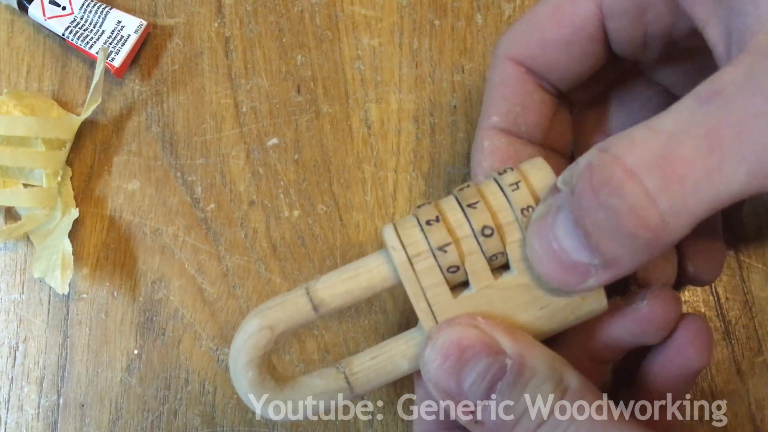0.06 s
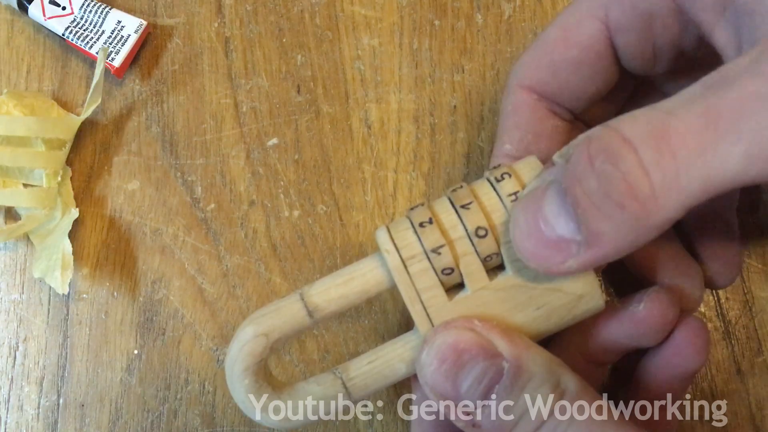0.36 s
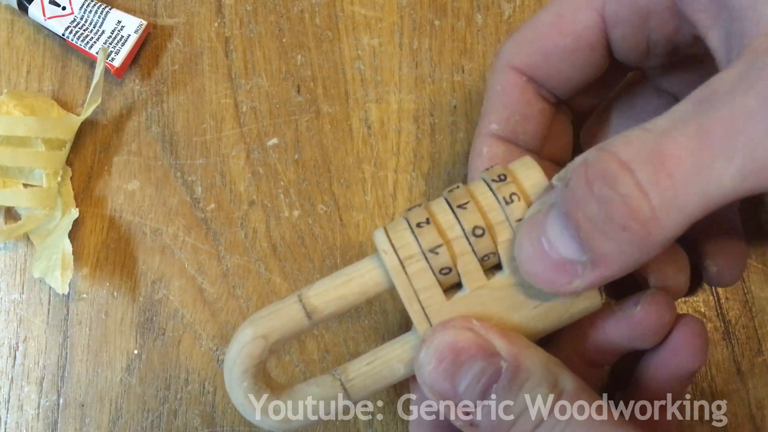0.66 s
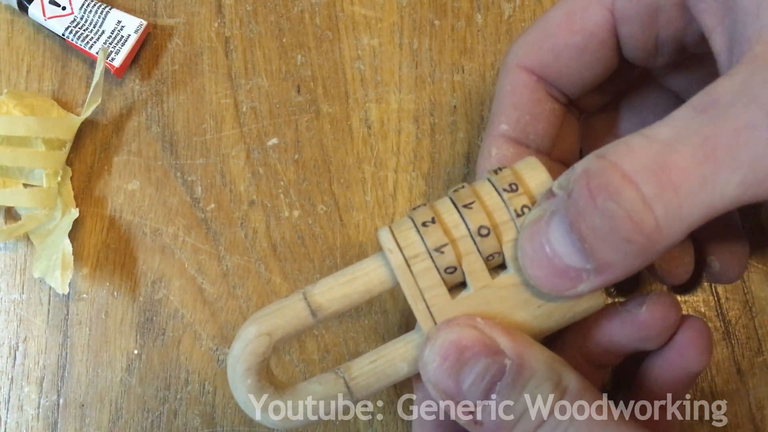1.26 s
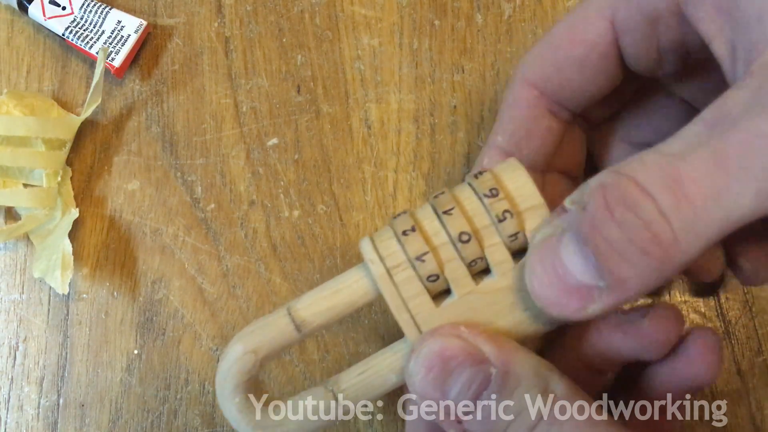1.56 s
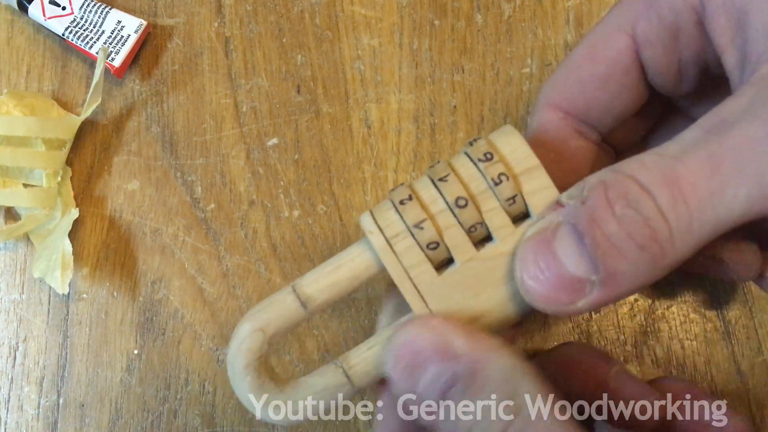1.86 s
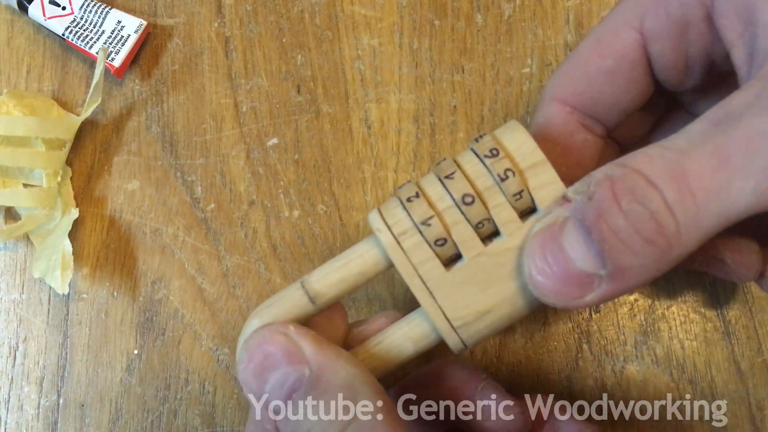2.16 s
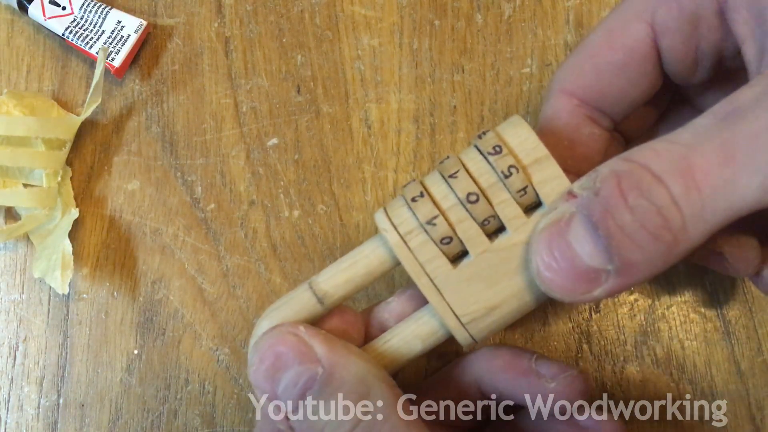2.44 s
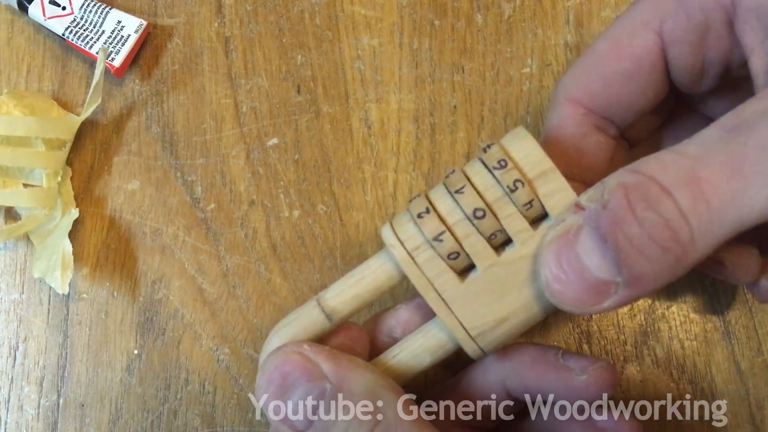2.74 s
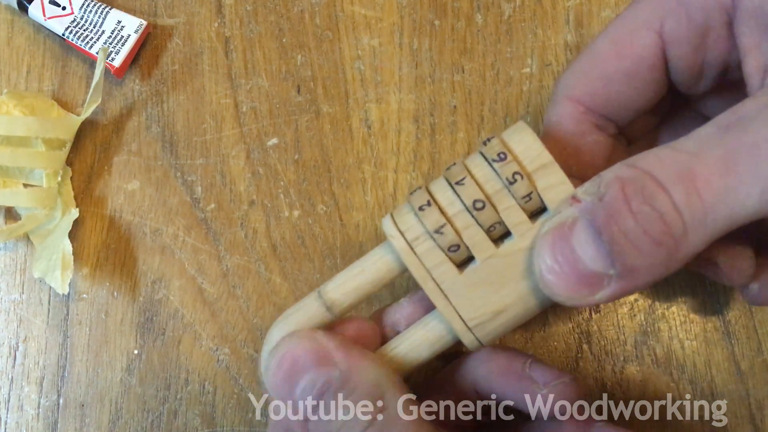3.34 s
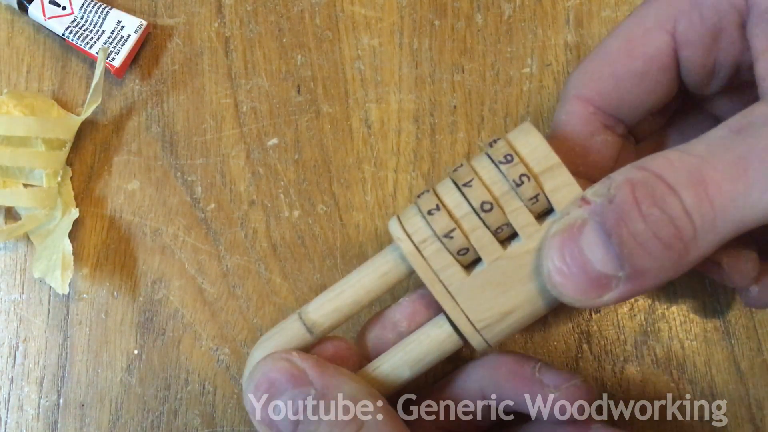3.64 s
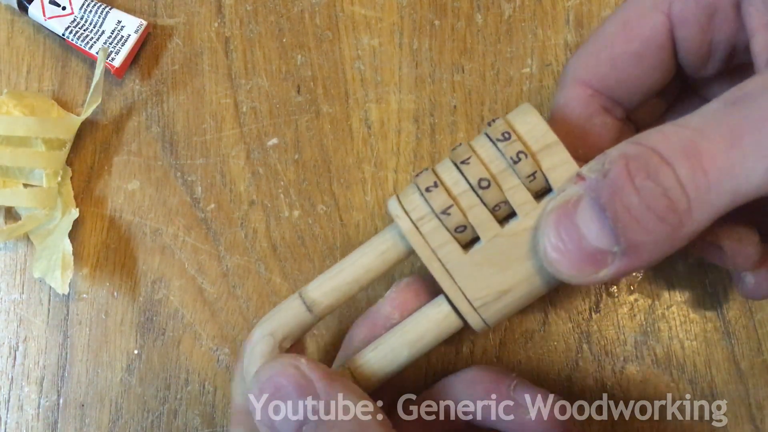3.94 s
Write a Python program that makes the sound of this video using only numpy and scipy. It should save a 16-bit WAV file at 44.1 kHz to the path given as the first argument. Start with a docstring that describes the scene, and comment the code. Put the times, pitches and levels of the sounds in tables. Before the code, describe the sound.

A wooden combination lock is worked close up over a low hum in a small, quiet room. For the first second its dial turns with soft rubs and faint ticks. Fingers slide over the wood from about 1.5 to 2.3 seconds. A light click comes near 3.2; at 3.4 the shackle frees with a sharp clack, brief scrape and knock. A soft rub follows near 3.9.

```python
"""Soft rubbing and ticking over a low room hum: a thumb turns a dial of a wooden combination lock.
Fingers slide to a new grip and try the shackle. A tug frees it with a sharp clack;
it scrapes outward and knocks against its stop. Rubs and scrapes are dense tiny slips;
each wood contact cracks and rings the lock's modes. Heard close up in a small, quiet room."""
import sys
import numpy as np
from scipy import signal
from scipy.fft import rfft, irfft
from scipy.io import wavfile
from scipy.ndimage import uniform_filter1d

SR = 44100
rng = np.random.default_rng(int(sys.argv[2]) if len(sys.argv) > 2 else 0)


def master_out(mix):
    """Clip the mix to full scale and print it as 16-bit PCM to the path in sys.argv[1]."""
    frames = np.transpose(np.atleast_2d(mix))
    ceiling = np.clip(frames, -1, 1)
    pcm = np.round(ceiling * 32767).astype(np.int16)
    wavfile.write(sys.argv[1], SR, pcm)


N = 176400

# room rumble and hiss: freq_hz, relative_db
AIR_SPECTRUM = [(20, -89), (27, -72), (34, -58), (45, -70.5), (66, -62), (82, -69), (120, -69.5),
                (160, -74), (210, -79), (330, -81.5), (480, -89), (750, -91.5), (1050, -92.5),
                (1500, -96.5), (2800, -95.5), (4300, -98.5), (6100, -97), (7200, -98), (9500, -97),
                (13000, -97), (16000, -103)]
# appliance hum: pitch_hz, level_db, waver_db
HUM_TONES = [(103, -66.5, 1.5), (299, -79, 0), (322, -77.5, 1)]
# deep drone: time_s, level_db
DRONE_ENVELOPE = [(0, -48), (.35, -50), (.65, -48), (1.1, -50), (1.4, -47.5), (1.75, -51), (2.05, -47),
                  (2.4, -50.5), (2.8, -47.3), (3.15, -50.5), (3.5, -48.5), (4, -49)]
# thin whine: time_s, level_db
WHINE_ENVELOPE = [(0, -82), (1.5, -83), (2.3, -85.5), (3, -85.5), (4, -86.5)]
# reverb: low_hz, high_hz (capped below Nyquist), t60_s, gain_db
REVERB_BANDS = [(150, 630, 0.62, 0), (710, 1700, 0.5, -2.5), (1480, 3300, 0.39, -.5),
                (3200, 5600, 0.38, -3.5), (7900, 29000, 0.26, -5)]
# skin sliding on wood: start_s, length_s, level_db, tilt_db_per_octave
FINGER_STROKES = [(1.562, .04, -72, 2), (1.534, 0.39, -70, 0), (1.801, 0.028, -66, -1),
                  (1.885, 0.079, -57, 3.5), (1.99, 0.049, -63.5, 10), (1.887, 0.33, -63.5, 0),
                  (2.266, 0.12, -72, -1.5), (3.187, 0.046, -68, -0.5), (3.915, 0.12, -64.5, 0)]
# skin friction: freq_hz, relative_db
SKIN_SPECTRUM = [(300, -8), (700, -6), (1150, -2.5), (2000, -6.5), (2900, -1.5), (3700, 1.5), (4900, -1),
                 (5600, 0.5), (7200, -3.5), (8900, 1.5), (9700, 0), (11200, 1), (12300, -3), (13000, 0.5),
                 (16000, -11)]
# dial turns: start_s, length_s, level_db
DIAL_STROKES = [(0.107, 0.14, -66), (0.283, 0.13, -72), (0.441, 0.19, -67), (0.768, 0.15, -77.5)]
# dial friction: freq_hz, relative_db
DIAL_SPECTRUM = [(400, -27), (1500, -4), (2300, -6), (3100, 1), (4900, -6.5), (6400, 3), (8000, -3),
                 (9700, 1.5), (13000, -3), (16000, -7)]
# binding surfaces: start_s, length_s, level_db, pitch_hz
BIND_STROKES = [(0.293, .10, -70.5, 7130), (0.723, 0.045, -70.5, 6400), (1.901, 0.072, -58.5, 8970),
                (3.143, 0.015, -65.5, 3820), (3.396, .03, -70, 2520), (3.447, 0.013, -48.5, 2850),
                (3.937, 0.074, -60, 8000)]
# shackle scrapes: start_s, length_s, level_db
SHACKLE_STROKES = [(3.151, 0.0098, -64), (3.407, 0.031, -68.5), (3.4337, 0.0326, -45.5)]
# shackle friction: freq_hz, relative_db
SHACKLE_SPECTRUM = [(150, 5), (400, -21), (1100, -5.5), (2000, -5), (2850, -1), (3600, -5), (4900, -10),
                    (6400, -2.5), (7800, -4), (10000, -1), (16000, -12.5)]
# lock resonances: pitch_hz, relative_db, t60_s
BODY_MODES = [(597, -21.5, 0.0053), (964, -16, 0.013), (1220, -13, 0.0071), (1820, -16, 0.009),
              (2440, -18.5, 0.0038), (2810, -13, 0.0058), (3700, -15, 0.0068), (4230, -20.5, 0.006),
              (6150, -5.5, 0.0093), (6930, -11.5, 0.01), (8200, -11, 0.0045), (9210, -10.5, 0.0063),
              (10500, -5.5, 0.0034), (13600, -12, 0.0028)]
# wood on wood: start_s, relative_db, low_hz, high_hz
CONTACTS = [(.392, -46.5, 2500, 11800), (.474, -45, 11000, 18000), (.671, -48.5, 5500, 18000),
            (0.72, -53, 5500, 18000), (.807, -56, 1800, 9000), (.857, -51.5, 2000, 12000),
            (1.172, -59, 6000, 18000), (1.573, -42, 2200, 4500), (1.820, -44.5, 2500, 7960),
            (2.013, -33, 1000, 2400), (3.128, -43.5, 3500, 16900), (3.1598, -24.5, 400, 3860),
            (3.4353, -25, 400, 2200), (3.4381, -18.5, 590, 12500), (3.4399, -6, 7350, 8300),
            (3.4637, -16, 404, 2740), (3.4652, -29.5, 6500, 17000), (3.4655, -24.5, 690, 3260),
            (3.885, -44, 3000, 7940), (3.917, -58, 2500, 10100)]
# microphone dips: centre_hz, width_hz, depth_fraction
MIC_NOTCHES = [(4940, 460, .4), (7900, 590, 0.27), (10410, 500, .45)]

DIAL_SLIPS_PER_S, DIAL_SPREAD_DB = 5000, -1


def amp(db):
    """Decibels to gain."""
    return 10 ** (np.asarray(db) / 20)


def unit(x):
    """Scale to rms 1."""
    return x / np.sqrt(np.mean(x ** 2))


def colour(x, spectrum, tilt_db_per_octave=0):
    """Shape and tilt the spectrum, 20 dB per octave roll-off past its ends; rms 1."""
    octave = np.log2(np.maximum(np.fft.rfftfreq(N, 1 / SR), 1))
    hz, db = np.array(spectrum).T
    inside = np.clip(octave, np.log2(hz[0]), np.log2(hz[-1]))
    shape_db = np.interp(inside, np.log2(hz), db) + tilt_db_per_octave * inside
    rolloff_db = 20 * np.abs(octave - inside)
    return unit(irfft(rfft(x) * amp(shape_db - rolloff_db), N))


def band(x, hz, kind):
    """Second-order Butterworth filter."""
    sos = signal.butter(2, np.minimum(hz, SR / 2 - 20), kind, fs=SR, output="sos")
    return signal.sosfilt(sos, x)


def wander(rate_hz):
    """Smooth random curve, rms 1."""
    hold = int(SR / rate_hz)
    steps = np.repeat(rng.standard_normal(N // hold + 1), hold)
    return unit(uniform_filter1d(uniform_filter1d(steps, hold), hold)[:N])


def add(out, start_s, x):
    """Mix x in at start_s."""
    i = int(start_s * SR)
    out[i:i + len(x)] += x[:N - i]


def decay(t, t60_s):
    """Exponential fall, 60 dB in t60_s."""
    return np.exp(-np.log(1000) * t / t60_s)


def stroke(start_s, length_s, attack=0.35, release=0.42):
    """Trapezoid envelope of one movement; ramps are fractions of its length."""
    progress = (np.arange(N) / SR - start_s) / length_s
    return np.clip(np.minimum(progress / attack, (1 - progress) / release), 0, 1)


def friction(slips_per_s, spread_db, flutter_hz=110, flutter_db=1.5):
    """Dense tiny slips of uneven size under fluttering hand pressure."""
    slips = rng.random(N) < slips_per_s / SR
    size_db = spread_db * np.minimum(rng.exponential(size=N), 4)
    pressure_db = flutter_db * wander(flutter_hz)
    return slips * rng.standard_normal(N) * amp(size_db + pressure_db)


def tone(pitch_hz, rms_db, drift_hz=0.25):
    """Sine with slight pitch drift."""
    cycles = np.cumsum(pitch_hz + drift_hz * wander(rate_hz=4)) / SR
    return np.sqrt(2) * amp(rms_db) * np.sin(2 * np.pi * cycles)


def background(air_db=-64, drone_hz=51.9, whine_hz=962.6):
    """Rumble and hiss, wavering appliance hum, deep drone, thin whine."""
    t = np.arange(N) / SR
    air = amp(air_db) * colour(rng.standard_normal(N), AIR_SPECTRUM)
    hum = sum(tone(hz, db + waver_db * wander(rate_hz=6.05)) for hz, db, waver_db in HUM_TONES)
    drone = tone(drone_hz, np.interp(t, *np.array(DRONE_ENVELOPE).T))
    whine = tone(whine_hz, np.interp(t, *np.array(WHINE_ENVELOPE).T))
    return air + hum + drone + whine


def room(x, gain_db=-10.5, buildup_s=0.02):
    """Small-room reverb; treble dies first."""
    t = np.arange(SR // 2) / SR
    tail = sum(amp(db) * band(rng.standard_normal(len(t)), [low_hz, high_hz], "band") * decay(t, t60_s)
               for low_hz, high_hz, t60_s, db in REVERB_BANDS)
    mid_t60_s = REVERB_BANDS[1][2]
    decay_energy = SR * mid_t60_s / np.log(1000) / 2
    tail *= np.minimum(t / buildup_s, 1) / np.sqrt(decay_energy)
    return amp(gain_db) * signal.fftconvolve(x, tail)[:N]


def fingers():
    """Skin hisses over wood; each stroke has its own brightness."""
    grain = friction(slips_per_s=12000, spread_db=0.5)
    return sum(amp(db) * colour(grain, SKIN_SPECTRUM, tilt) * stroke(start_s, length_s)
               for start_s, length_s, db, tilt in FINGER_STROKES)


def dial():
    """The dial rubs on its neighbours."""
    grain = colour(friction(DIAL_SLIPS_PER_S, DIAL_SPREAD_DB), DIAL_SPECTRUM)
    return grain * sum(amp(db) * stroke(start_s, length_s) for start_s, length_s, db in DIAL_STROKES)


def binds(width_hz=530):
    """Where a surface binds, friction gathers in one narrow resonance."""
    out = np.zeros(N)
    grain = friction(DIAL_SLIPS_PER_S, DIAL_SPREAD_DB)
    for start_s, length_s, db, hz in BIND_STROKES:
        resonance = signal.lfilter(*signal.iirpeak(hz, hz / width_hz, fs=SR), grain)
        out += amp(db) * unit(resonance) * stroke(start_s, length_s)
    return out


def shackle():
    """The shackle scrapes in its holes, starting and stopping abruptly."""
    grain = colour(friction(slips_per_s=25000, spread_db=2), SHACKLE_SPECTRUM)
    return grain * sum(amp(db) * stroke(start_s, length_s, attack=0.05, release=0.05)
                       for start_s, length_s, db in SHACKLE_STROKES)


def jolt(start_s=3.434, length_s=0.02, pitch_hz=172, peak_db=-49):
    """Low thump as the hand takes the shackle's release."""
    thump = np.sin(2 * np.pi * pitch_hz * (np.arange(N) / SR - start_s))
    return amp(peak_db) * thump * stroke(start_s, length_s, attack=0.11, release=0.7)


def clicks(crack_db=-3.5, crack_decay_s=0.0005):
    """Each contact cracks and rings the lock: sharp ones in a high band, blunt ones low."""
    out = np.zeros(N)
    t = np.arange(SR // 10) / SR
    body = sum((-1) ** k * amp(db) * np.sin(2 * np.pi * hz * t) * decay(t, t60_s)
               for k, (hz, db, t60_s) in enumerate(BODY_MODES))
    for start_s, relative_db, low_hz, high_hz in CONTACTS:
        crack = amp(crack_db) * rng.standard_normal(len(t)) * np.exp(-t / crack_decay_s)
        blunted = band(band(body + crack, high_hz, "low"), high_hz, "low")
        add(out, start_s, amp(relative_db) / 2 * band(blunted, low_hz, "high"))
    return out


def scene():
    """Background, lock and its reverb; mono."""
    floor = background()
    lock = dial() + binds() + fingers() + shackle() + jolt() + clicks()
    return (floor + lock + room(lock))[None]


def record(dry):
    """The microphone housing carves shallow dips; a steep low-pass cuts the top."""
    cutoff_hz = 15850
    for hz, width_hz, depth in MIC_NOTCHES:
        dry = dry - depth * signal.lfilter(*signal.iirpeak(hz, hz / width_hz, fs=SR), dry)
    return signal.sosfilt(signal.ellip(10, .2, 70, cutoff_hz, fs=SR, output="sos"), dry)


dry = scene()
out = record(dry)
master_out(out)
```